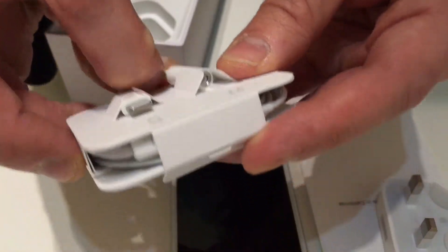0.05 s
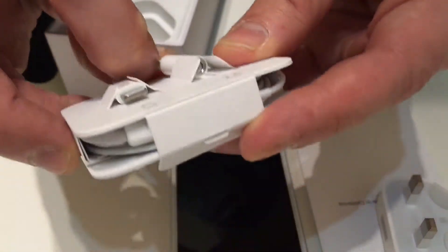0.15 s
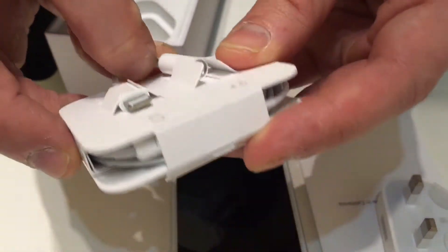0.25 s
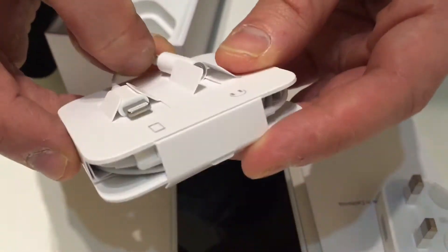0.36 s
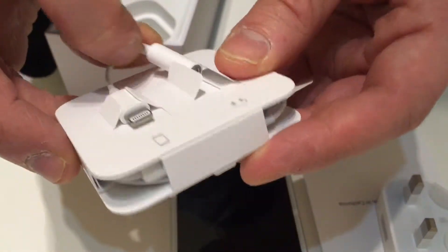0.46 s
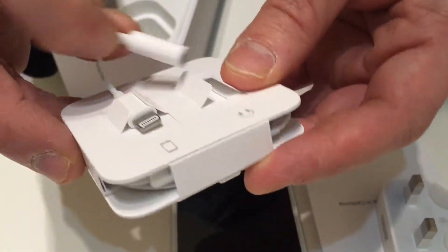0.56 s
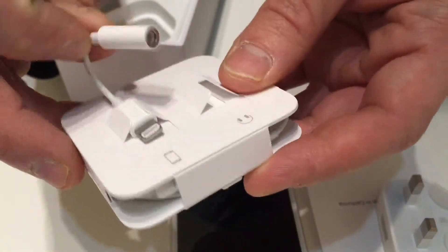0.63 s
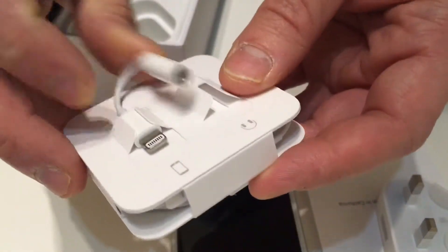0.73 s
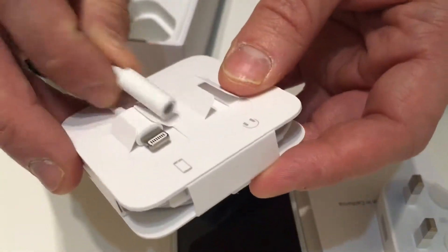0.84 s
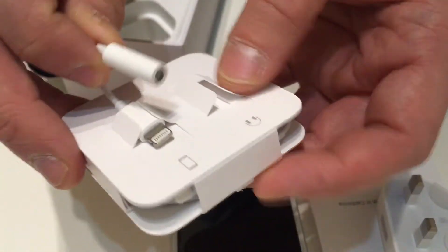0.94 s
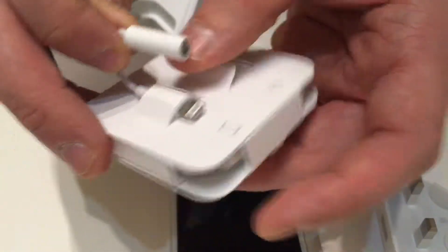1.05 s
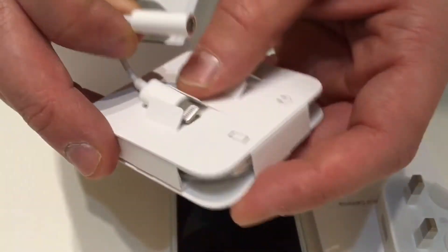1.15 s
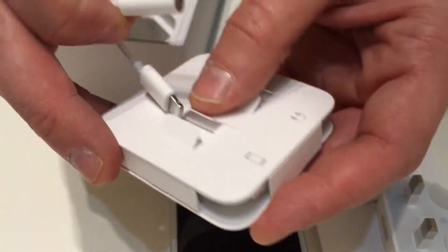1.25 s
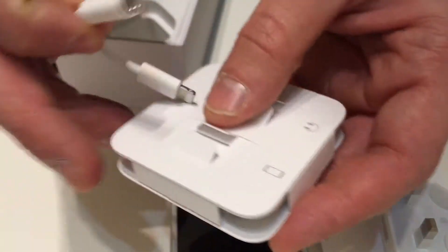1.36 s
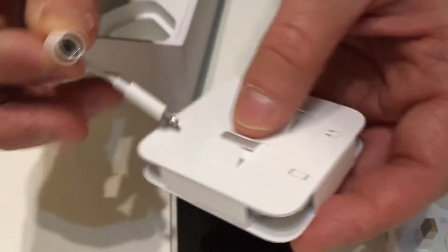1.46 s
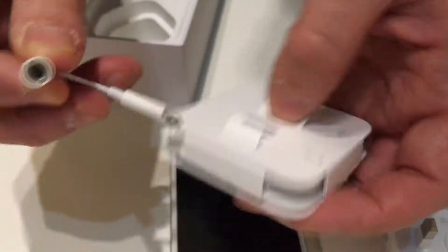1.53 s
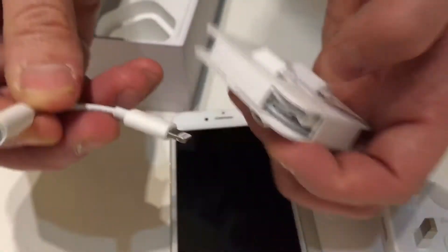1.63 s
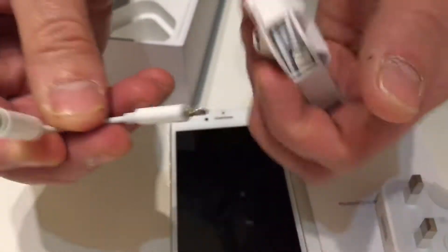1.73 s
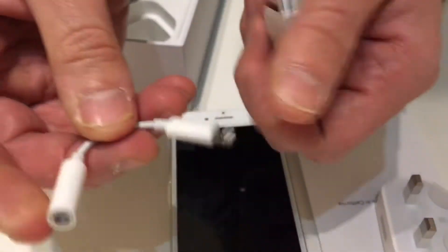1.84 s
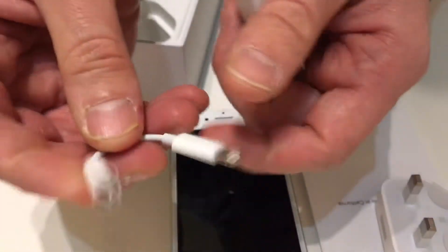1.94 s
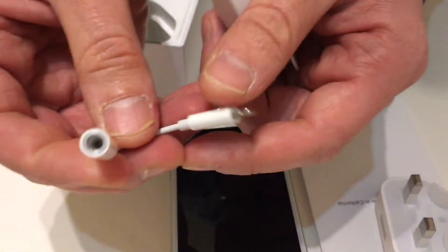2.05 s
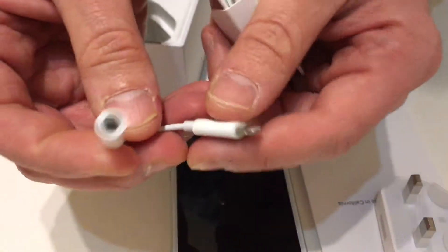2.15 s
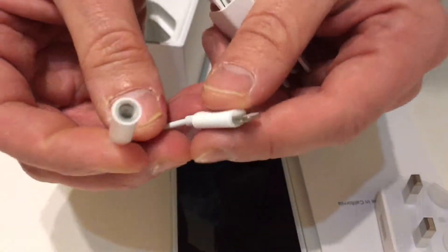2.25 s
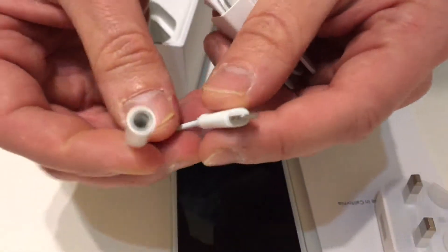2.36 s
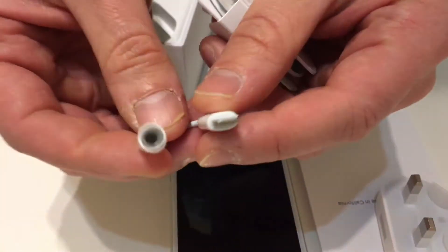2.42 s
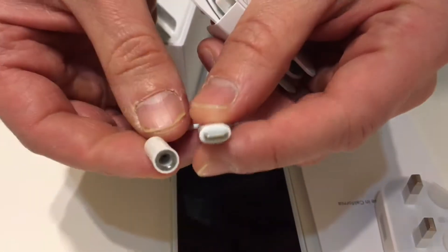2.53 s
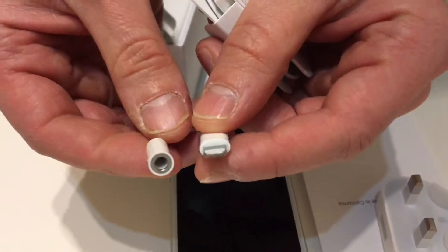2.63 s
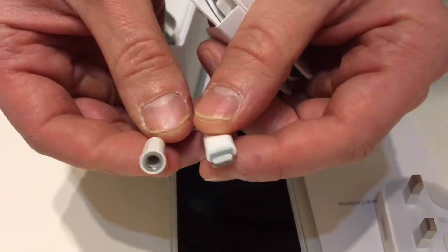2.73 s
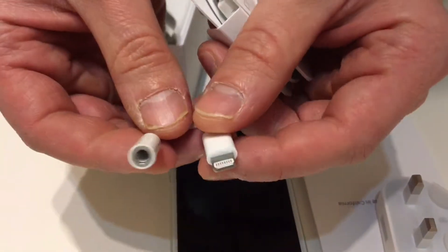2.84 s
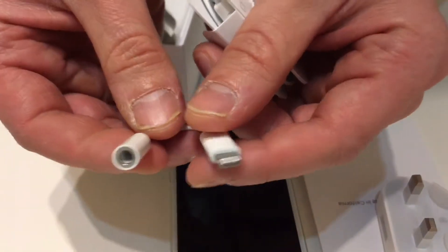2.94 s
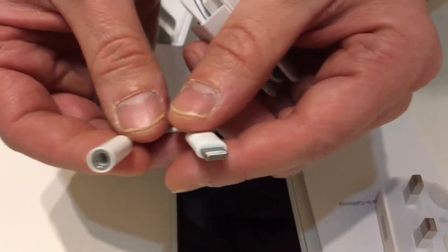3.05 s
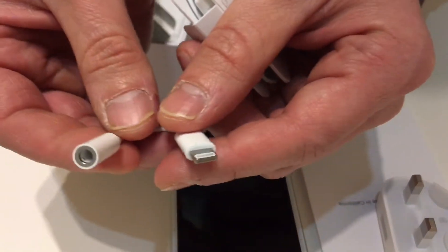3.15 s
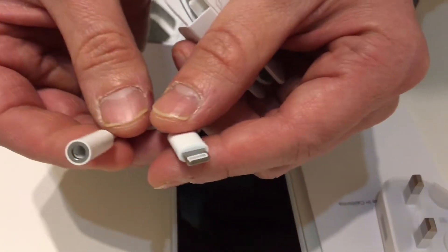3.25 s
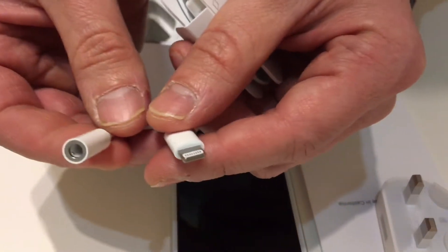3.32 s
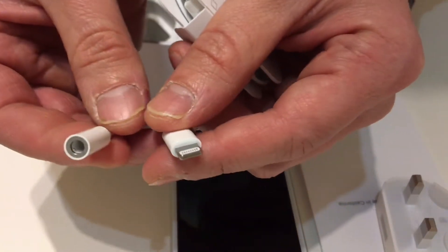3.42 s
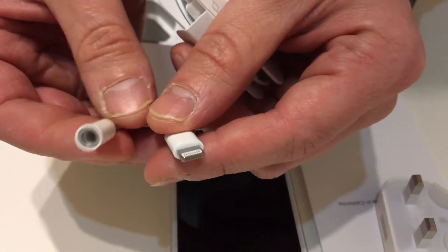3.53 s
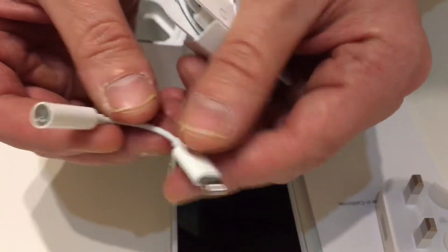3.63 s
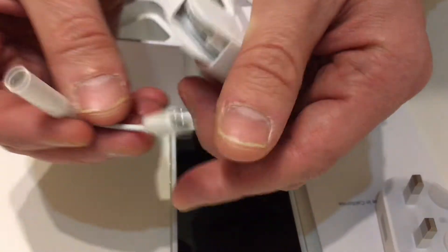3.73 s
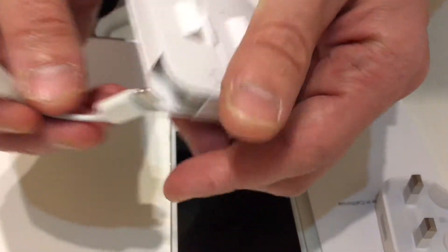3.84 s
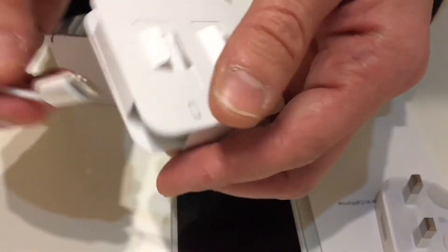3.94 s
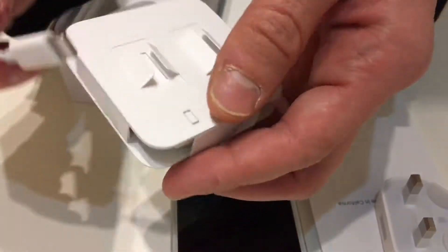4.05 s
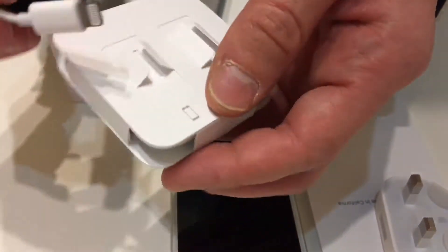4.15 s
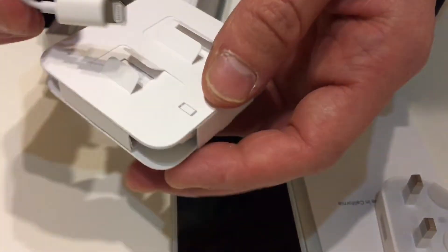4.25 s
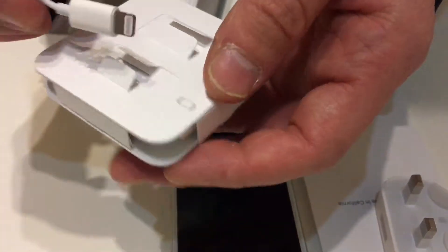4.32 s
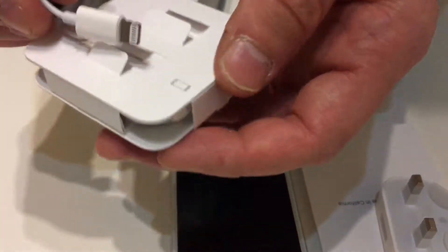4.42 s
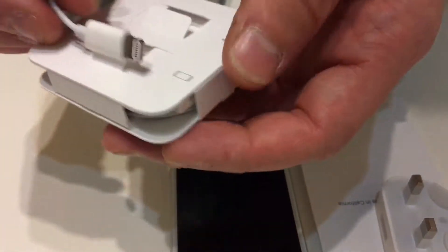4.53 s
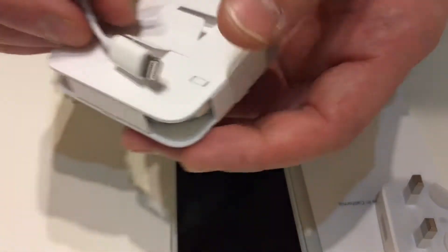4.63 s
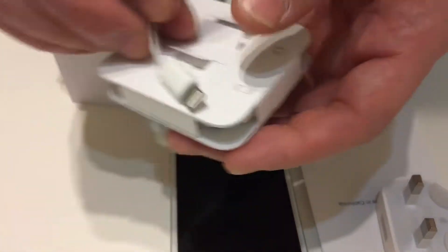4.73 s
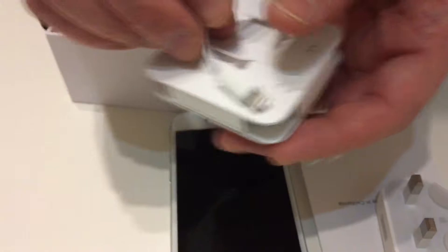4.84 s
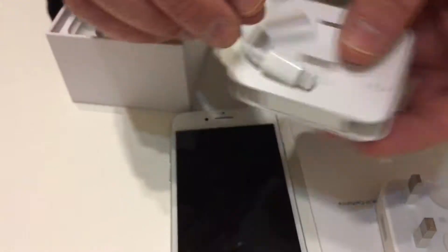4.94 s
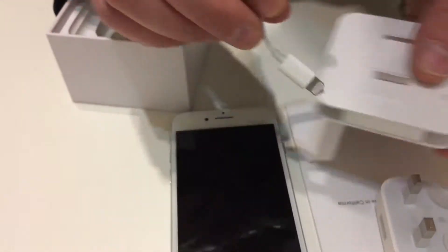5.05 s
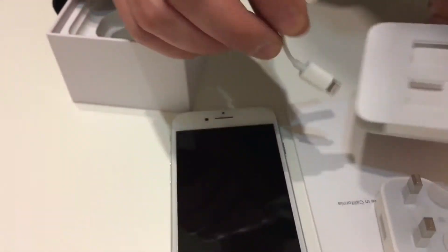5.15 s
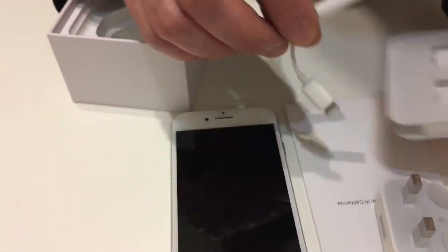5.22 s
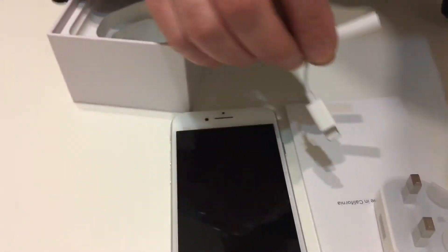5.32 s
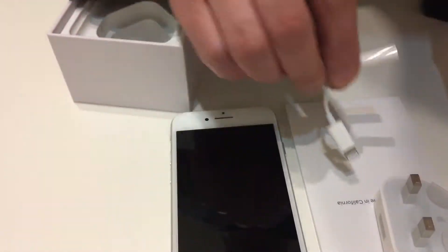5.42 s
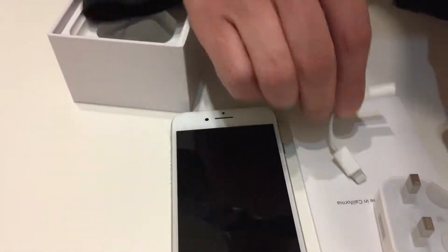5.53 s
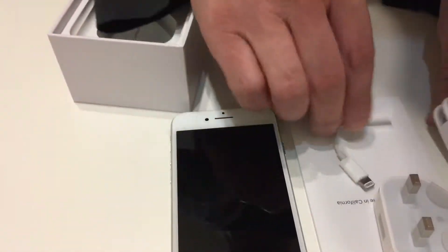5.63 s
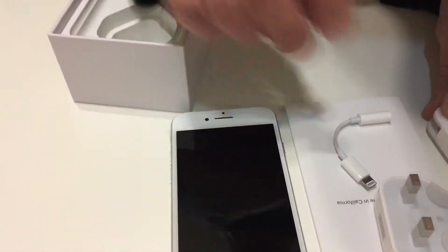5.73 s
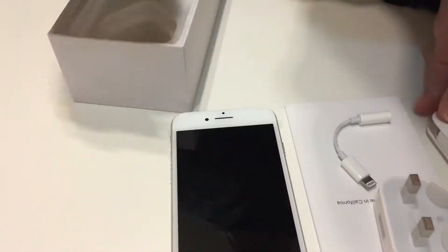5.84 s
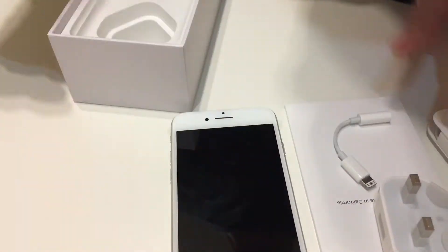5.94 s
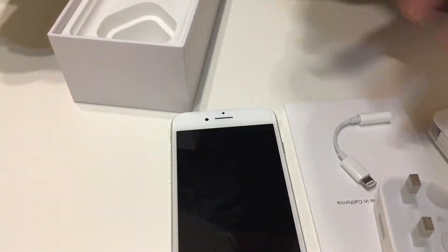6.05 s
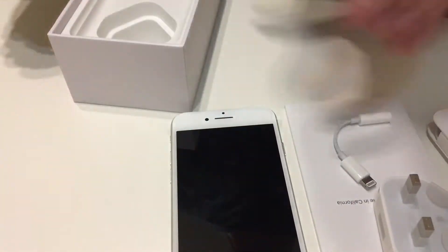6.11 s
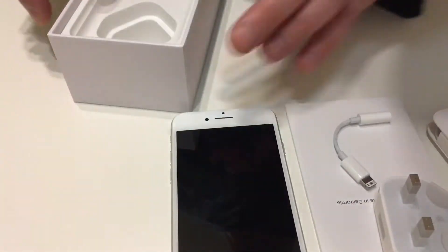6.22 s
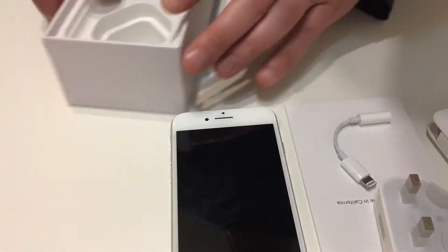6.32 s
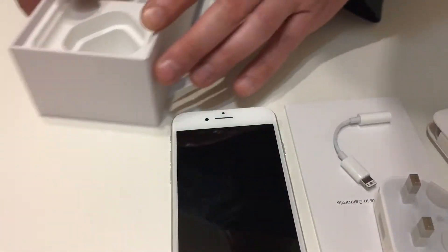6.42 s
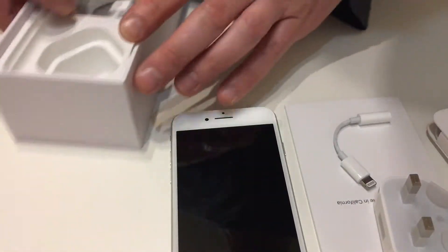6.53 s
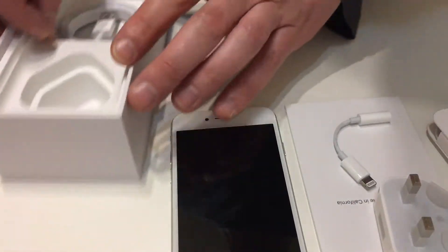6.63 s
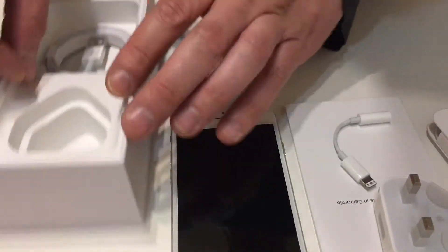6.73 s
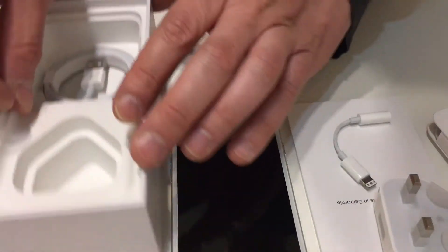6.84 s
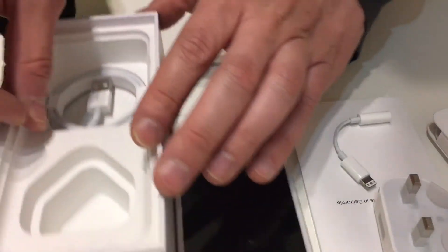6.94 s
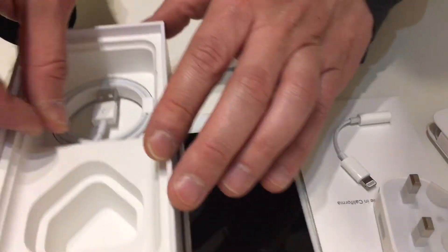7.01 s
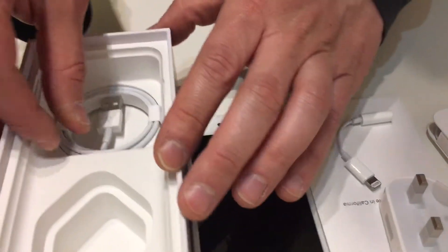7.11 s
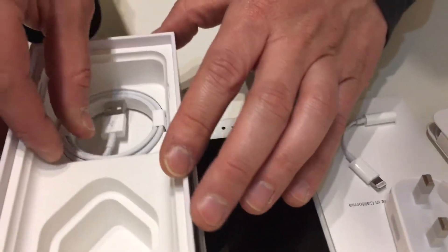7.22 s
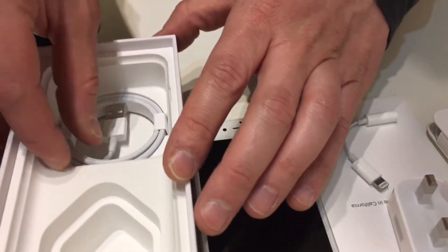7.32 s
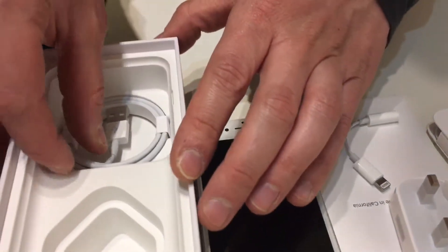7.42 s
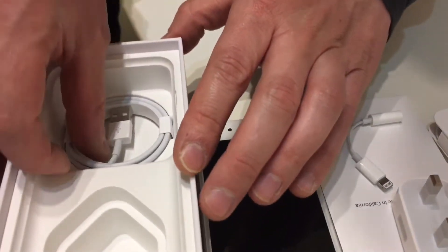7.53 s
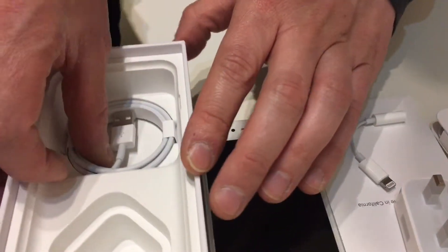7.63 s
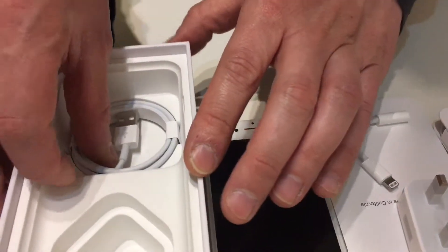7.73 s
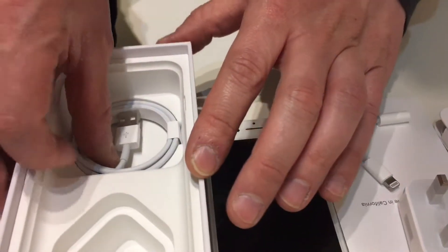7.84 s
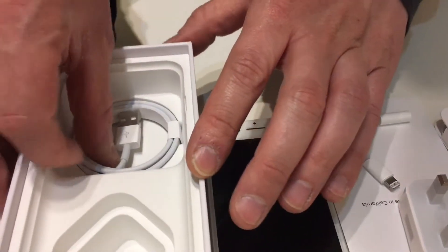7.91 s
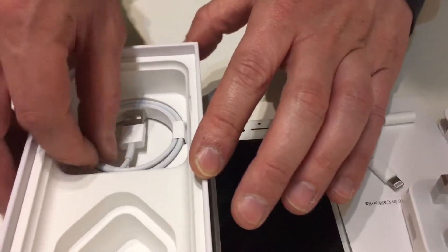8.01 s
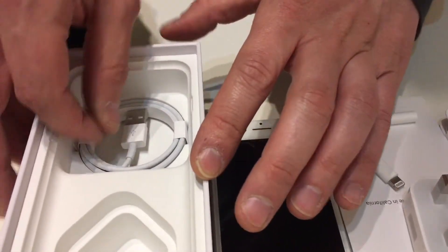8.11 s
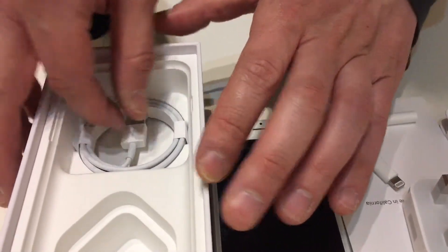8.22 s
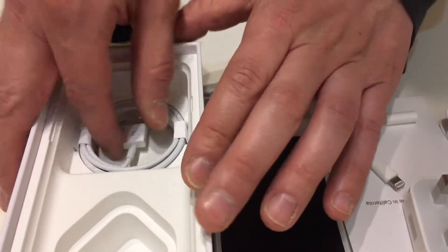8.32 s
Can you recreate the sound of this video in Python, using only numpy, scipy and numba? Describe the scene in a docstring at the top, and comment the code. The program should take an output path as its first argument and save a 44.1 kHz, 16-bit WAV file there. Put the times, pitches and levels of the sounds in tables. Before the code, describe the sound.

Close, dry handling sounds in a small quiet room, over low rumble and faint hiss. A loud crisp card snap comes at 0.1 s, soft rubbing follows, then another bright snap with tiny ticks at 0.6. From 0.8 to 2 s, short scrapes, hissy rubs, small clicks, squeaks and crackles come in quick succession as the cable adapter comes free. A faint low hum swells around 2-3 s while handling thins to near stillness. Light rubs return at 3.8, faint ticks at 4.5, then a very bright, sharp card squeak and scrape at 4.95. Hard taps hit the table at 5.55-5.85, the sharpest at 5.7. Soft bumps at 6.25 start a cardboard box dragging, rasping louder and higher until a hollow bump at 7 and a brief groan. Quiet finger scuffs, fine cable ticks and soft knocks in the tray continue, with a last small tap at 8.26.

```python
"""Tabs snap close by from the start, among card rubs, as hands work a small cable adapter out of its card holder.
Card rubs, squeaks and crackles: random tiny slips and ticks are filtered into the colours of card and fingers.
Holder and adapter tap down on a table; a cardboard box slides over, bumps to a stop, and fingers dig in its tray.
Taps are smeared impulses, bumps are fading sine tones with a noise thud, and the slide is noise led by a speed curve.
A small, quiet room answers, over a low rumble, a faint 100 Hz hum that swells, and hiss."""
import sys
import numpy as np
from scipy import signal
from scipy.fft import rfft, irfft
from scipy.io import wavfile
from scipy.ndimage import uniform_filter1d
from numba import njit

SR = 44100
rng = np.random.default_rng(int(sys.argv[2]) if len(sys.argv) > 2 else 0)


def pcm_store(signal):
    """Save signal as 16-bit PCM."""
    levels = np.round(np.clip(np.atleast_2d(signal), -1, 1) * 32767)
    wavfile.write(sys.argv[1], SR, levels.astype(np.int16).T)


N = 369116  # length in samples


def db_to_gain(db):
    """Turn decibels into a multiplier."""
    return 10 ** (np.asarray(db) / 20)


def unit(x):
    """Scale to an average (rms) level of 1."""
    return x / np.sqrt(np.mean(x ** 2) + 1e-20)


def add(out, start_s, x):
    """Mix x into out, beginning at start_s."""
    i = max(int(start_s * SR), 0)
    out[i:i + len(x)] += x[:len(out) - i]


def curves(table):
    """Draw straight lines between a table's rows: one value per sample for each column after the time."""
    times_s, *columns = np.transpose(table)
    return [np.interp(np.arange(N) / SR, times_s, column) for column in columns]


def walk(changes_per_s):
    """Wander smoothly and at random around 0, with a spread near 1."""
    k = max(int(SR / changes_per_s), 2)
    steps = np.repeat(rng.standard_normal(N // k + 1), k)
    return unit(uniform_filter1d(steps, k)[:N])


def colour(x, points):
    """Filter x to the outline given by (pitch_hz, level_db) points, with no sound before its cause."""
    size = 4096
    hz, db = np.transpose(points)
    grid = np.maximum(np.arange(size // 2 + 1) * SR / size, 1)
    octaves_outside = np.maximum(np.log2(hz[0] / grid), 0) + np.maximum(np.log2(grid / hz[-1]), 0)
    slope_db = 16 * np.minimum(octaves_outside, 3)
    outline_db = np.interp(np.log(grid), np.log(hz), db) - slope_db
    # folding the cepstrum puts the filter's energy as early as possible
    cepstrum = irfft(np.log(db_to_gain(outline_db)))
    cepstrum[1:size // 2] *= 2
    cepstrum[size // 2 + 1:] = 0
    return signal.oaconvolve(x, irfft(np.exp(rfft(cepstrum))))[:len(x)]


@njit
def band(x, hz, width):
    """Pass a band whose centre can move every sample; width is a share of the centre."""
    y, b, l = np.empty(len(x)), 0., 0.
    for i in range(len(x)):
        g = np.tan(np.pi * min(hz[i], .44 * SR) / SR)
        v = (b + g * (x[i] - l)) / (1 + g * (g + width))
        b, l, y[i] = 2 * v - b, l + 2 * g * v, width * v
    return y


# colour of the still air: pitch_hz, level_db (per Hz, relative)
AIR_COLOUR = [(25, -27), (50, -9), (90, -5.5), (130, -16.5), (220, -14), (500, -25), (1650, -31.5),
              (7700, -37.5), (14000, -28), (16000, -38.5)]
AIR_DB = -66.5
# faint low hum that swells: time_s, level_db (before its random wavering)
HUM_LEVEL = [(1.9, -80), (2.15, -69.5), (2.75, -72), (3.3, -81)]
HUM_HZ = 100


def air():
    """Low room rumble and microphone hiss from filtered noise, and a faint swelling hum from a wavering sine."""
    noise = unit(colour(rng.standard_normal(N), AIR_COLOUR)) * db_to_gain(AIR_DB)
    hum = np.sqrt(2) * np.sin(2 * np.pi * HUM_HZ * np.arange(N) / SR)
    return noise + db_to_gain(curves(HUM_LEVEL)[0] + 2 * walk(20)) * hum


def friction(slips_per_s, spread_db, smooth, judder_db, judder_rate):
    """Paper fibres catch and let go: tiny slips over a smooth hiss, coming in bunches."""
    sizes = db_to_gain(spread_db * np.minimum(rng.exponential(size=N), 4))
    slips = (rng.random(N) < slips_per_s / SR) * sizes * rng.choice([-1, 1], N)
    steady = unit(slips) + smooth * rng.standard_normal(N)
    return unit(steady * db_to_gain(judder_db * walk(judder_rate)))


def contact(x, points, hz, width, wander, broad):
    """Colour friction, adding a resonance that shifts as the point of contact moves."""
    x = colour(x, points)
    centre_hz = hz * np.exp(wander * walk(35))
    resonance = unit(band(x, centre_hz, width))
    return unit(resonance + broad * unit(x))


STROKE_ATTACK_S, STROKE_RELEASE_S = 0.024, 0.041  # at most half the stroke each


def stroke(start_s, length_s):
    """Loudness of one rub: the finger speeds up, holds and stops; a short rub has no hold."""
    t = np.arange(N) / SR - start_s
    rise = t / min(STROKE_ATTACK_S, length_s / 2)
    fall = (length_s - t) / min(STROKE_RELEASE_S, length_s / 2)
    ramp = np.clip(np.minimum(rise, fall), 0, 1)
    return ramp ** 2 * (3 - 2 * ramp)


def strokes(table):
    """Gains over time for the three layers of a table of rubs; overlapping rubs add in power."""
    power = np.zeros((3, N))
    for start_s, length_s, *levels_db in table:
        span = slice(int(start_s * SR), int((start_s + length_s) * SR))
        shape = stroke(start_s, length_s)[span]
        power[:, span] += np.outer(db_to_gain(levels_db[:3]), shape) ** 2
    return np.sqrt(power)


# strokes of card and cable in the hands (levels before the small trims in rubbing):
# start_s, length_s, flex_db, scrape_db, hiss_db, card_pitch_hz
HAND_STROKES = [(0.339, 0.146, -64, -67.5, -66.5, 2297), (0.503, 0.096, -58.5, -60.5, -52, 2137),
                (0.841, .036, -60, -58, -45, 2200), (1.007, 0.075, -59, -50.5, -40, 2073),
                (1.051, 0.11, -73, -64.5, -55, 2470), (1.2, 0.091, -61.5, -44.5, -45, 2386),
                (1.262, 0.092, -52.5, -47.5, -51.5, 2790), (1.335, 0.066, -49.5, -50, -48, 2410),
                (1.411, 0.072, -56, -52, -50, 2555), (1.516, 0.11, -50, -45.5, -41, 3040),
                (1.678, 0.035, -51.5, -51, -55, 2723), (1.806, 0.066, -56.5, -50.5, -48, 2325),
                (1.903, 0.1, -54, -53.5, -50, 2174), (2.108, 0.075, -63, -64.5, -59.5, 2200),
                (2.409, 0.066, -62.5, -55, -58.5, 2000), (3.115, 0.058, -66, -69.5, -81, 1593),
                (3.779, 0.175, -63.5, -59, -52.5, 2256), (3.946, 0.11, -70.5, -65, -64, 2703),
                (4.111, 0.076, -65, -76, -76.5, 1703), (4.366, .07, -76.5, -78.5, -64, 2300),
                (4.772, 0.075, -63, -67.5, -64.5, 2626), (4.873, 0.062, -54.5, -57, -47, 2830),
                (4.927, 0.077, -49.5, -46.5, -40, 2900), (4.947, 0.052, -67, -42, -24, 2880),
                (4.966, 0.092, -48, -51, -47, 2874), (5.027, 0.094, -50.5, -51, -48.5, 2700),
                (5.12, 0.1, -68, -63, -56.5, 2760), (5.238, 0.343, -74, -66, -58.5, 3190),
                (5.556, 0.096, -51.5, -51, -56.5, 2660), (5.752, 0.155, -61.5, -54.5, -59, 3070),
                (5.875, 0.249, -70, -66, -65, 3030)]
# light fidgeting between strokes, quieter while the adapter is held up:
# time_s, level_db (before a small offset for each layer)
FIDGET_LEVEL = [(0, -80), (.25, -66.5), (1.0, -66), (1.65, -65.5), (2.1, -72), (2.55, -76), (2.7, -86),
                (3.6, -87.5), (3.75, -65), (4.3, -78), (4.7, -72), (5.6, -73), (6.2, -76.5)]
# muffled skin gripping card and brushing the table: time_s, level_db
FINGER_LEVEL = [(0, -73.5), (.35, -66.5), (.9, -68.5), (1.6, -76.5), (2.1, -75), (3.5, -99), (4.3, -74.5),
                (5.4, -79), (5.9, -67), (6.15, -67.5), (6.3, -72)]
# colours of the bending card, its scraping edge and the rubbing hiss: pitch_hz, level_db (relative)
FLEX_COLOUR = [(500, -29.5), (1200, -8), (1800, -2), (2400, -0.5), (3100, 4), (3800, -0.5), (6000, -29.5)]
SCRAPE_COLOUR = [(900, -17), (2800, -6.5), (3900, 5), (5200, -2.5), (6600, 1), (8500, -8), (11000, -18.5)]
HISS_COLOUR = [(5000, -46.5), (7800, -3), (9300, 4), (10500, -2), (12500, 4.5), (14800, 2), (15800, 3),
               (16500, -40.5)]
EDGE_RATIO = 2.2  # pitch of the scraping edge over that of the card


def rubbing():
    """Card slides on card and skin; the same slips flex the sheet, scrape its edge and sound dull in the fingers."""
    fidget = db_to_gain(curves(FIDGET_LEVEL)[0])
    fidget_layers = fidget * db_to_gain([[-1.5], [.5], [1.5]])
    flex, scrape, hiss = np.hypot(strokes(HAND_STROKES), fidget_layers)
    # the card's pitch glides from the middle of one stroke to the next
    card_hz, = curves([(start_s + length_s / 2, hz) for start_s, length_s, *_, hz in HAND_STROKES])
    slips = friction(slips_per_s=700, spread_db=0.0, smooth=1.0, judder_db=2.5, judder_rate=90)
    fibres = friction(slips_per_s=2700, spread_db=1.5, smooth=0.56, judder_db=-0.9, judder_rate=780)
    bending = contact(slips, FLEX_COLOUR, card_hz, width=0.5, wander=0.086, broad=0.56)
    scraping = contact(slips, SCRAPE_COLOUR, EDGE_RATIO * card_hz, width=0.3, wander=0.15, broad=1.2)
    hissing = contact(fibres + slips, HISS_COLOUR, 12000, width=.35, wander=0.1, broad=1.6)
    muffled = unit(colour(slips, [(130, 2.0), (300, -1.5), (1100, -8.5)]))
    return (db_to_gain(0.76) * flex * bending
            + db_to_gain(-1.2) * scrape * scraping
            + db_to_gain(-1.5) * hiss * hissing
            + db_to_gain(curves(FINGER_LEVEL)[0]) * muffled)


def snap(t, spread_s, rattle, rattle_s):
    """One impulse, smeared because each pitch's bending waves arrive at their own moment; a faint rattle follows."""
    order = 40
    bins = len(t) // 2 + 1
    lateness = rng.random(order + 1) ** 3
    delay_s = spread_s * np.interp(np.linspace(0, order, bins), np.arange(order + 1), lateness)
    phase = 2 * np.pi * np.cumsum(delay_s + .0002) * SR / len(t)
    crack = irfft(np.exp(-1j * phase), len(t)) * (1 - t / t[-1]) ** 2
    rattling = unit(rng.standard_normal(len(t)) * t * np.exp(-t / rattle_s))
    return unit(crack) + rattle * rattling


SECOND_MODE = 1.3  # pitch of the second bending mode over the first


def click_part(x, points, hz, width, tone, second):
    """Hear a snap through a broad colour and damped bending modes; average level 1 over its first 5 ms."""
    head = int(.005 * SR)
    y = colour(x, points)
    first = band(y, np.full(len(y), float(hz)), width)
    upper = band(y, np.full(len(y), float(hz * SECOND_MODE)), width)
    y = unit(y) + tone * unit(first + second * upper)
    return y / np.sqrt(np.mean(y[:head] ** 2))


# colours of a click's low knock, body and stiff edge: pitch_hz, level_db (relative)
KNOCK_COLOUR = [(250, -30.5), (500, -5.5), (750, -4.5), (1000, -8.5), (1550, -2), (2100, -12.5),
                (3500, -29)]
BODY_COLOUR = [(450, -31), (1000, -24.5), (1750, -1.5), (2400, 2.5), (3000, -1.5), (3800, -0.5), (5200, -8),
               (8000, -22)]
EDGE_COLOUR = [(3500, -37), (5400, -6), (6600, -5.5), (7900, -6), (9500, 2), (12500, 0.5), (15000, 3.5),
               (16800, -17.5)]
BODY_WIDTH, EDGE_WIDTH = .36, .14  # shares of the pitch


def click(knock_db, body_db, edge_db, body_hz, edge_hz):
    """One sharp contact: a low knock, the ring of the body and that of its stiff edge."""
    t = np.arange(int(.04 * SR)) / SR
    knock_snap = snap(t, spread_s=.002, rattle=0.99, rattle_s=0.0017)
    knock = click_part(knock_snap, KNOCK_COLOUR, 1280, width=0.28, tone=0.49, second=0.7)
    body_snap = snap(t, spread_s=.0015, rattle=0.91, rattle_s=0.00095)
    body = click_part(body_snap, BODY_COLOUR, body_hz, BODY_WIDTH, tone=0.53, second=0.52)
    edge_snap = snap(t, spread_s=.0018, rattle=0.39, rattle_s=0.0013)
    edge = click_part(edge_snap, EDGE_COLOUR, edge_hz, EDGE_WIDTH, tone=1.0, second=0)
    return db_to_gain(knock_db) * knock + db_to_gain(body_db) * body + db_to_gain(edge_db) * edge


# tabs of the card holder snap, later a burst of cable ticks in the tray:
# start_s, body_db, edge_db, body_pitch_hz, edge_pitch_hz
LIGHT_SNAPS = [(0.0925, -20.5, -17, 2520, 6700), (0.5643, -49.5, -48, 2270, 6660),
               (0.5907, -26.5, -13.5, 1900, 15400), (0.602, -35, -41, 2050, 13270),
               (0.6137, -38, -39, 2630, 14850), (0.826, -55, -49, 2600, 12500),
               (0.8454, -35.5, -32.5, 4400, 16200), (0.869, -43.5, -39.5, 3670, 6250),
               (0.8762, -31.5, -33.5, 2030, 13600), (1.0219, -56, -45, 4900, 11800),
               (1.1236, -50, -49, 2000, 12400), (1.181, -35, -40, 2640, 9000),
               (1.258, -47, -32, 4750, 15200), (1.276, -43, -39, 1870, 11900),
               (1.3711, -27.5, -46, 2300, 8550), (1.417, -34, -46, 2680, 5700),
               (1.527, -41.5, -44, 2710, 15230), (3.063, -47, -48, 2090, 5060),
               (4.505, -45, -38.5, 4580, 8400), (4.5252, -51, -41.5, 4430, 8560),
               (4.787, -47.5, -56.5, 2070, 13500), (5.0296, -34.5, -58.5, 2840, 5500),
               (7.044, -60, -37, 2970, 15100), (7.104, -48, -43.5, 3000, 12000),
               (7.4182, -63, -41.5, 3800, 12100), (7.423, -61, -47, 3800, 12000),
               (7.429, -68, -46, 3800, 12500), (7.437, -67, -43, 3820, 13600)]
SNAP_KNOCK_DB = -20.5  # these light snaps have little low knock; relative to the body
# hard taps on the table and in the box:
# start_s, knock_db, body_db, edge_db, body_pitch_hz, edge_pitch_hz
HARD_TAPS = [(5.5647, -36.5, -31.5, -33.5, 1460, 5400), (5.6811, -40, -37.5, -39, 3020, 6000),
             (5.6985, -23, -23.5, -15.5, 1290, 15700), (5.7334, -46, -37.5, -42.5, 2960, 7000),
             (5.8306, -74, -44, -29.5, 5740, 6730), (7.0235, -39.5, -46, -40, 1300, 6070),
             (7.602, -55, -55, -55, 2400, 6500), (7.621, -54, -53, -49, 2490, 12900),
             (7.6426, -48, -49, -52, 1400, 11100), (8.2584, -46.5, -50, -54, 2190, 12300)]


def clicks():
    """Card tabs and cable snap with little low knock; things put down tap with a heavier one."""
    out = np.zeros(N)
    for start_s, body_db, edge_db, body_hz, edge_hz in LIGHT_SNAPS:
        add(out, start_s, click(body_db + SNAP_KNOCK_DB, body_db, edge_db, body_hz, edge_hz))
    for start_s, *tap in HARD_TAPS:
        add(out, start_s, click(*tap))
    return out


def stick_slip(table, width):
    """Quick sticking and slipping sings: noise in a narrow or wide band that glides as the grip changes."""
    out, t = np.zeros(N), np.arange(SR // 2) / SR
    for start_s, length_s, db, first_hz, last_hz in table:
        progress = np.minimum(t / length_s, 1)
        pitch_hz = first_hz + (last_hz - first_hz) * progress
        tone = band(rng.standard_normal(len(t)), pitch_hz, width)
        tone = band(tone, pitch_hz, width)
        add(out, start_s, db_to_gain(db) * unit(tone) * np.sin(np.pi * progress))
    return out


# card squeaks where it is pulled tight: start_s, length_s, level_db, first_pitch_hz, last_pitch_hz
CARD_SQUEAKS = [(1.215, 0.024, -43, 4970, 4700), (1.345, 0.032, -48, 6000, 6400),
                (4.605, 0.14, -63, 2280, 2020), (4.894, 0.017, -46, 5800, 6640),
                (4.946, 0.016, -39, 7000, 5100), (4.960, 0.01, -28, 9150, 10000),
                (4.963, 0.0079, -21, 14400, 10800), (4.966, .012, -26, 11100, 9000),
                (4.975, 0.011, -37.5, 5800, 6740), (4.977, .015, -21, 12500, 14900),
                (4.98, 0.055, -46, 3830, 3230)]


def squeaks():
    """Tight card sticks and slips in a narrow band, so it sounds pitched."""
    return stick_slip(CARD_SQUEAKS, width=0.14)


# card crackles as cable is drawn over it: start_s, length_s, level_db, pitch_hz
CARD_CRACKLES = [(1.227, 0.032, -47, 5050), (1.283, 0.042, -48.5, 2500), (1.381, 0.027, -50, 2300),
                 (1.421, 0.047, -41, 2450), (1.571, 0.029, -48.5, 3550), (1.93, 0.045, -49.5, 2230),
                 (5.708, .046, -51, 3300), (7.735, 0.027, -57, 2810), (7.866, 0.016, -51.5, 2980)]
CRACKLE_PER_S, CRACKLE_SPREAD_DB, CRACKLE_WIDTH = 400, 4, .3  # width is a share of the pitch


def crackles():
    """Fibres give way in an uneven run of ticks, each ringing the card."""
    out = np.zeros(N)
    for start_s, length_s, db, hz in CARD_CRACKLES:
        gaps, sizes = rng.random((round(length_s * CRACKLE_PER_S) + 1, 2)).T
        times = np.cumsum(.5 + gaps)
        places = ((times - times[0]) / times[-1] * length_s * SR).astype(int)
        ticks = np.zeros(int(length_s * SR) + 1)
        ticks[places] = db_to_gain(CRACKLE_SPREAD_DB * (2 * sizes - 1))
        ticks = np.pad(ticks, (0, SR // 250))  # room for the last tick to ring
        ringing = band(colour(ticks, BODY_COLOUR), np.full(len(ticks), float(hz)), CRACKLE_WIDTH)
        add(out, start_s, db_to_gain(db) * unit(ringing))
    return out


# card edges rasp, first under the cable, then where the box bites the table:
# start_s, length_s, level_db (before judder), first_pitch_hz, last_pitch_hz
CARD_RASPS = [(2.42, 0.12, -61, 3990, 4470), (6.37, 0.19, -54, 3940, 4760),
              (6.535, 0.065, -46, 12800, 13400), (6.58, 0.25, -57.5, 970, 1100),
              (6.62, 0.45, -50.5, 4640, 5500), (6.84, 0.2, -53, 11000, 13000),
              (7.37, 0.043, -56, 3600, 3900)]
RASP_JUDDER_DB, RASP_JUDDER_PER_S = 2, 120


def rasps():
    """A card edge sticks and slips in a wide band, rough and juddering rather than pitched."""
    return stick_slip(CARD_RASPS, width=0.65) * db_to_gain(RASP_JUDDER_DB * walk(RASP_JUDDER_PER_S))


# soft blows on box and table: start_s, box_ring_db, table_thud_db, contact_s
SOFT_BUMPS = [(5.5679, -34.5, -46.5, 0.00014), (5.682, -49, -69, 0.0014), (5.703, -42.5, -54, 0.0013),
              (5.845, -76, -58, 0.0032), (6.236, -49.5, -46, 0.0011), (6.294, -56, -45.5, 0.0031),
              (6.9804, -33, -46.5, 0.0014), (7.025, -37, -54, 0.0021), (7.752, -55, -53.5, 0.00059),
              (8.053, -61, -53.5, 0.0019), (8.2606, -52, -68, 0.00026)]
# tones of the box on the table: pitch_hz, level_db (relative), fade_s (time to fall 60 dB)
BOX_TONES = [(232, -8, .12), (277, -5, .33), (293, -1, .1), (330, 8, .028), (395, 0, .09), (450, 5, .035),
             (510, -6, .08), (600, 1, .05), (877, -1, .11)]


def bumps(thud_s=0.025):
    """A soft push rings the box, its ring holding no deep bass, and thuds the table; longer contact dulls the
    ring."""
    out, t = np.zeros(N), np.arange(SR // 2) / SR
    head = int(.02 * SR)  # blows are levelled over their first 20 ms
    box = sum(db_to_gain(db - 60 * t / fade_s) * np.sin(2 * np.pi * hz * t) for hz, db, fade_s in BOX_TONES)
    box = signal.sosfilt(signal.butter(3, 225, "high", fs=SR, output="sos"), box)
    thud_colour = [(30, -9), (52, 3.5), (120, -10.0), (220, -14.5), (500, -15.5)]
    for start_s, ring_db, thud_db, contact_s in SOFT_BUMPS:
        push = np.sin(np.pi * np.minimum(t[:head] / contact_s, 1))
        ring = signal.fftconvolve(box, push)[:len(t)]
        thud = colour(rng.standard_normal(len(t)) * np.exp(-t / thud_s), thud_colour)
        for y, db in (ring, ring_db), (thud, thud_db):
            add(out, start_s, db_to_gain(db) * y / np.sqrt(np.mean(y[:head] ** 2)))
    return out


# speed of the box over the table: time_s, speed (share of full speed)
SLIDE_SPEED = [(6.225, 0.017), (6.239, 0.24), (6.37, 0.26), (6.47, 0.29), (6.8, 0.48), (6.97, 0.74),
               (7.1, 0.57), (7.16, 0), (7.37, 0.088)]
# hands and cable scuffing the box and its tray (levels before the trim and grip in sliding):
# start_s, length_s, hollow_db, scrape_db, hiss_db
BOX_SCUFFS = [(6.53, 0.093, -63, -52.5, -53), (7.035, 0.025, -44, -61, -37), (7.08, 0.26, -57, -61, -72),
              (7.36, 0.17, -63, -62.5, -60.5), (7.5, 0.24, -59, -61, -62), (7.72, 0.051, -53, -49.5, -45.5),
              (7.858, 0.036, -59.5, -48.5, -40.5), (7.995, 0.078, -63, -59, -55.5),
              (8.03, 0.15, -65.5, -62, -69)]
# colours of the box's hollow inside and of its drag on the table: pitch_hz, level_db (relative)
HOLLOW_COLOUR = [(50, -20), (130, -13), (190, -9), (235, 0), (278, 3), (330, -4), (400, -2), (560, -11),
                 (800, -18), (1500, -35)]
DRAG_COLOUR = [(300, -61), (500, 7), (750, -11), (1050, 6), (1800, 1.5), (2600, 2), (3600, 2), (5200, 0.5),
               (7000, 2.5), (10000, -20)]
DRAG_HOLLOW_DB, DRAG_SCRAPE_DB, DRAG_HISS_DB = -56.5, -45.5, -43.5  # at full speed, before trim and grip
DRAG_SLOW_HZ, DRAG_FAST_HZ = 2680, 5000  # scrape pitch at rest and at full speed


def sliding():
    """The box drags, louder and higher with speed, and drones with its hollow inside; fingers scuff it."""
    t = np.arange(N) / SR
    speed = np.maximum(np.interp(t, *np.transpose(SLIDE_SPEED), left=0, right=0), 0)
    drag_layers = np.outer(db_to_gain([DRAG_HOLLOW_DB, DRAG_SCRAPE_DB, DRAG_HISS_DB]), speed)
    hollow, scrape, hiss = np.hypot(strokes(BOX_SCUFFS), drag_layers)
    drag_hz = DRAG_SLOW_HZ + (DRAG_FAST_HZ - DRAG_SLOW_HZ) * speed
    slips = friction(slips_per_s=1500, spread_db=1.0, smooth=1.2, judder_db=1.0, judder_rate=150)
    grip = db_to_gain(.4 * walk(30))
    drone = unit(colour(slips, HOLLOW_COLOUR))
    drag = contact(slips, DRAG_COLOUR, drag_hz, width=.35, wander=.08, broad=1.9)
    hissing = contact(slips, HISS_COLOUR, 11100, width=0.22, wander=0.15, broad=1.2)
    return db_to_gain(1.5) * hollow * drone + scrape * grip * drag + hiss * hissing


# the box sticks and slips on the table and groans:
# start_s, length_s, level_db (before judder), pitch_hz (before wavering)
BOX_GROANS = [(7.03, .06, -44, 275), (7.149, 0.14, -56, 258)]


def groans(waver=.045, judder_db=3.0):
    """The box judders on the table near its low ring: wavering sines of uneven loudness."""
    drift_s = np.cumsum(1 + waver * walk(60)) / SR
    tones = sum(db_to_gain(db) * stroke(start_s, length_s) * np.sin(2 * np.pi * hz * drift_s)
                for start_s, length_s, db, hz in BOX_GROANS)
    return np.sqrt(2) * tones * db_to_gain(judder_db * walk(45))


def room(x, wet_db, t60_low, t60_high, treble_db, early_db):
    """A few near reflections, then a short diffuse tail that loses its treble first."""
    t = np.arange(int(.6 * SR)) / SR
    onset = np.clip((t - .004) / 0.0049, 0, 1)
    dull = colour(rng.standard_normal(len(t)), [(100, 9.5), (2400, 1.0), (6800, -4.0), (10000, -3.5)])
    dull = dull * db_to_gain(-60 * t / t60_low)
    bright = colour(rng.standard_normal(len(t)), [(5000, -5), (9500, 1), (16000, 0.0)])
    bright = bright * db_to_gain(-60 * t / t60_high + treble_db)
    tail = unit((dull + bright) * onset) / np.sqrt(len(t))
    for lag_s in .0118, .0215, .0255:
        add(tail, lag_s, db_to_gain(early_db) * np.array([.5, 1, .5]) / 2)
    return db_to_gain(wet_db) * signal.fftconvolve(x, tail)[:N]


def scene():
    """Hands near the microphone, the table a little further off, all in one room."""
    snaps = clicks()
    knocks = bumps() + groans()
    rubs = rubbing() + crackles() + squeaks() + sliding() + rasps()
    echo = room(snaps + rubs + 0.97 * knocks, wet_db=-16.5, t60_low=0.27, t60_high=0.085,
                treble_db=2.5, early_db=-18.0)
    return (snaps + rubs + knocks + echo + air())[None]


TOP_HZ = 16600


def record(dry):
    """Drop the deepest rumble, round the tallest peaks and cut everything above the top pitch."""
    x = signal.sosfilt(signal.butter(4, 38, "high", fs=SR, output="sos"), dry)
    rounded = np.tanh(x)
    return signal.sosfilt(signal.ellip(10, .2, 80, TOP_HZ, fs=SR, output="sos"), rounded)


dry = scene()
out = record(dry)
pcm_store(out)
```